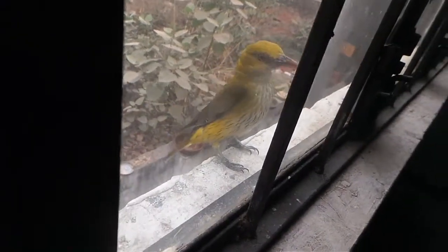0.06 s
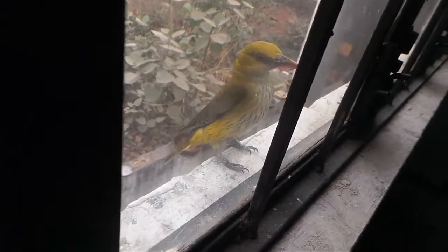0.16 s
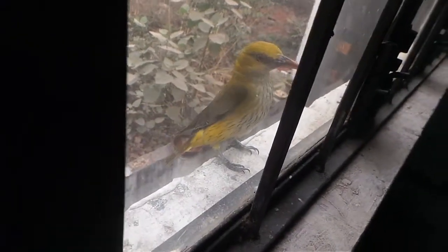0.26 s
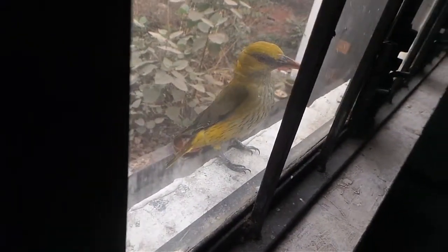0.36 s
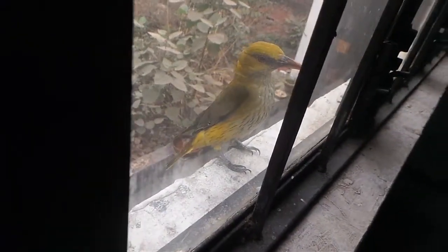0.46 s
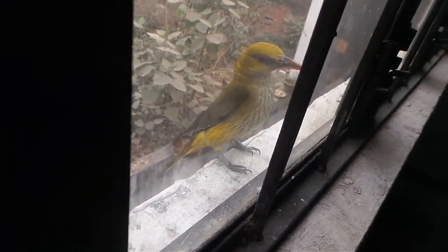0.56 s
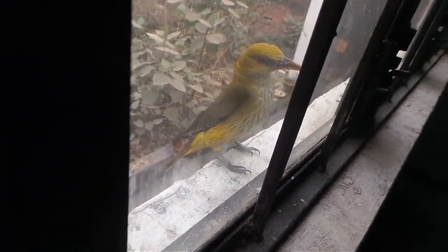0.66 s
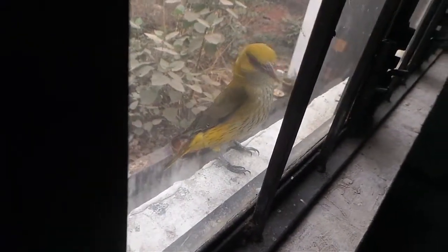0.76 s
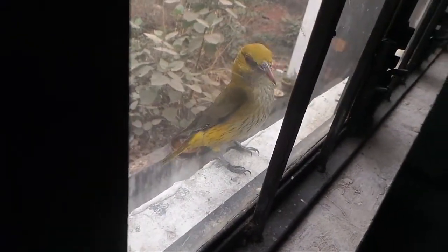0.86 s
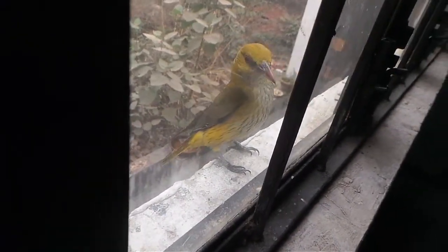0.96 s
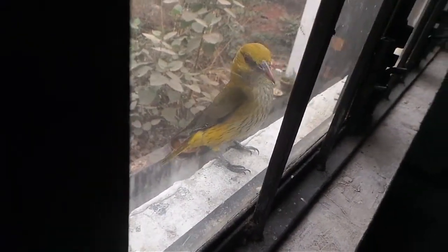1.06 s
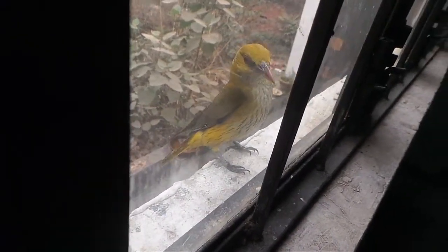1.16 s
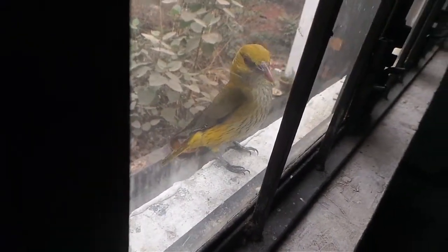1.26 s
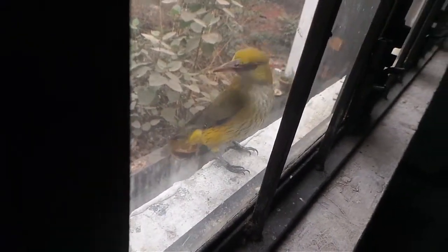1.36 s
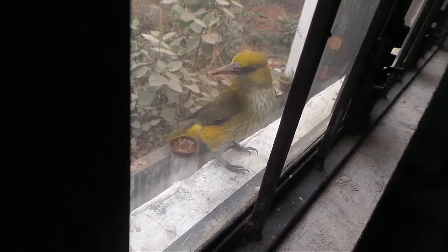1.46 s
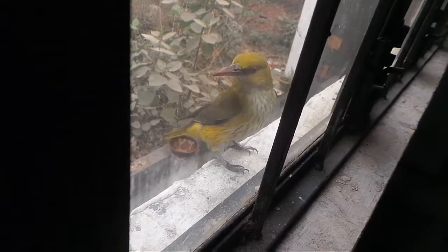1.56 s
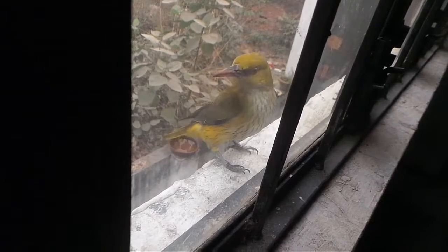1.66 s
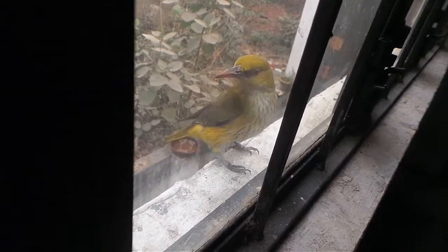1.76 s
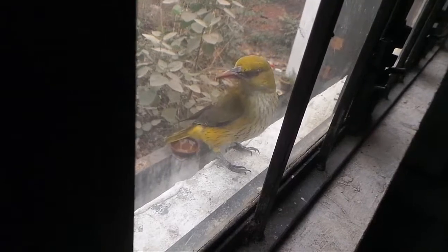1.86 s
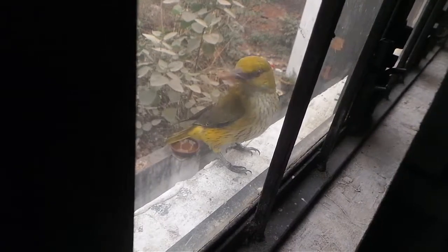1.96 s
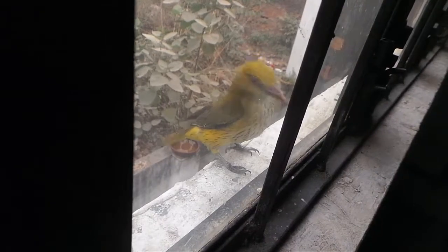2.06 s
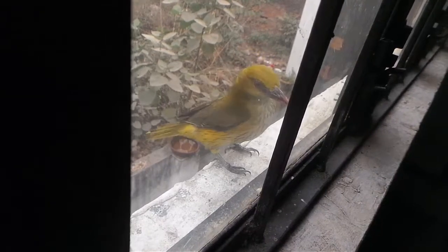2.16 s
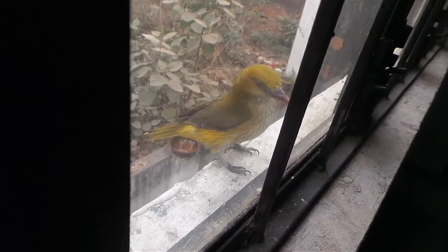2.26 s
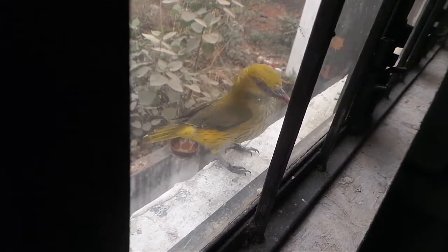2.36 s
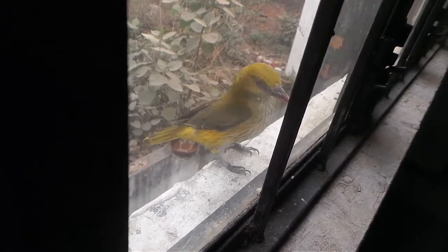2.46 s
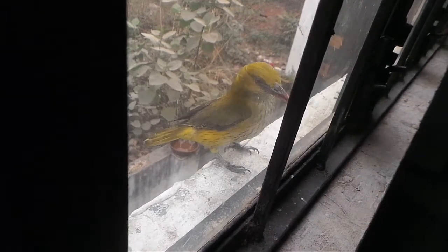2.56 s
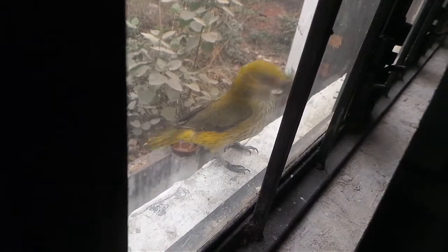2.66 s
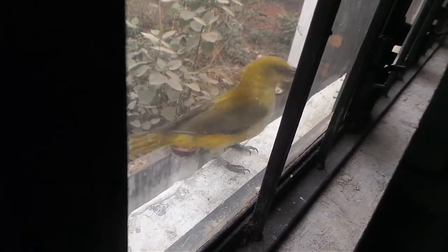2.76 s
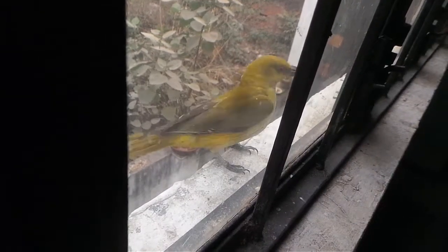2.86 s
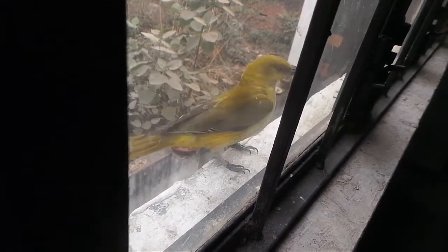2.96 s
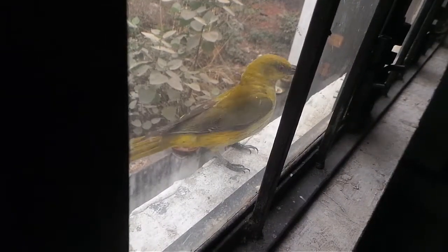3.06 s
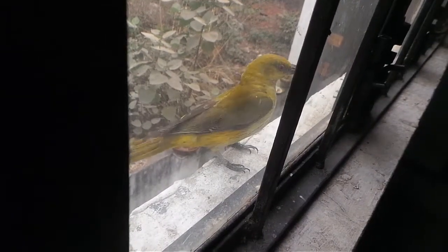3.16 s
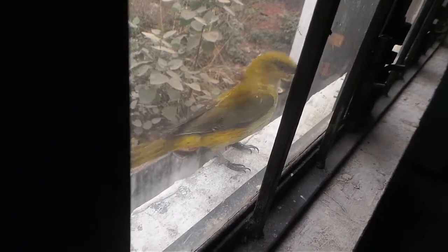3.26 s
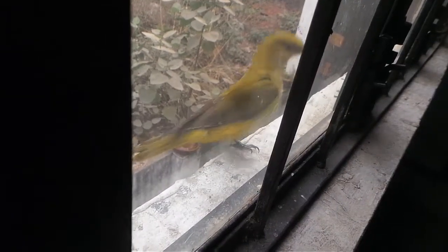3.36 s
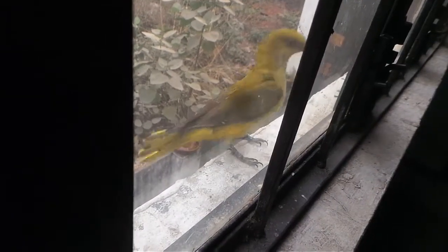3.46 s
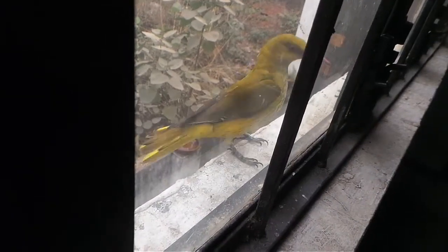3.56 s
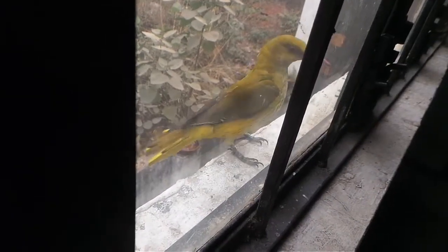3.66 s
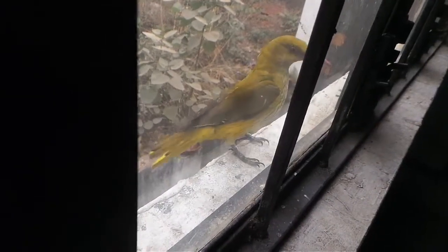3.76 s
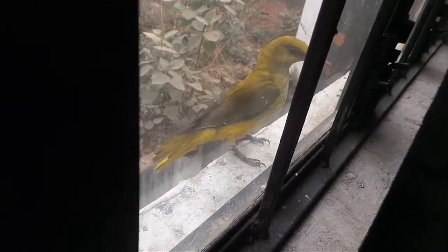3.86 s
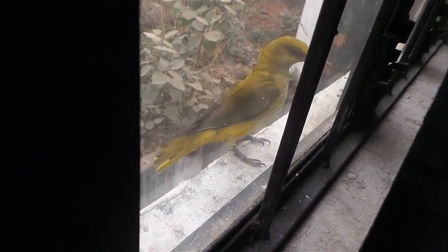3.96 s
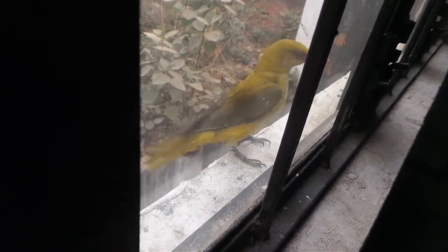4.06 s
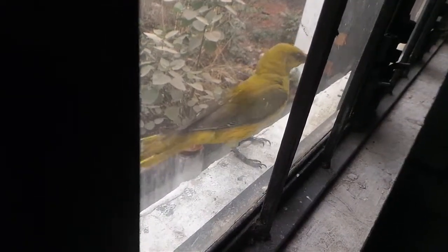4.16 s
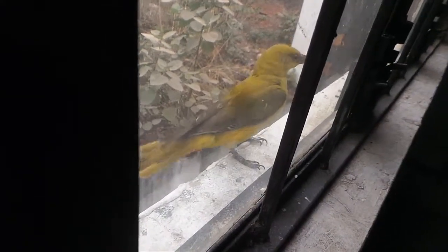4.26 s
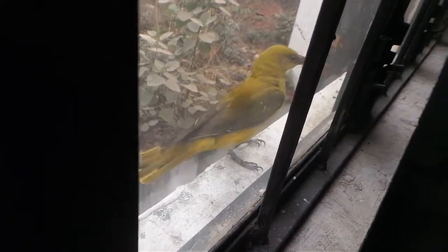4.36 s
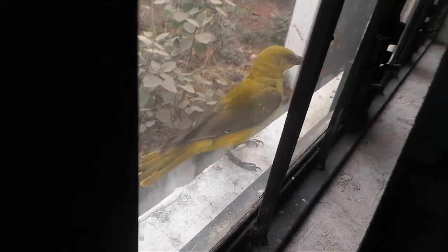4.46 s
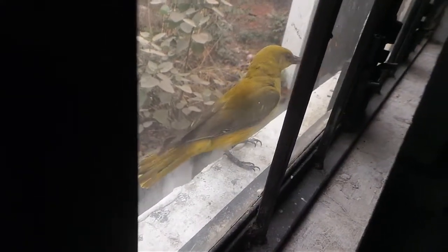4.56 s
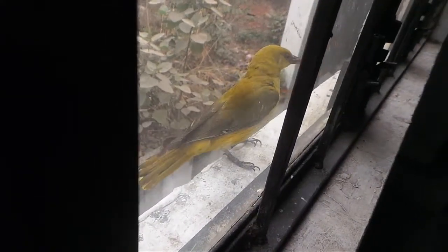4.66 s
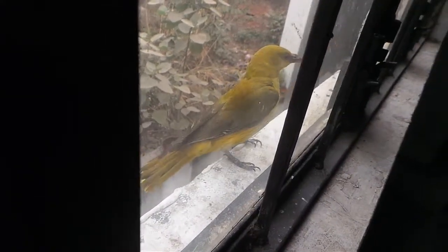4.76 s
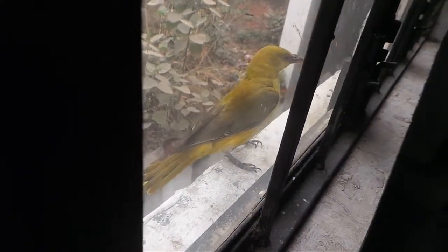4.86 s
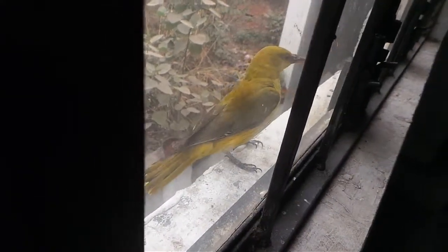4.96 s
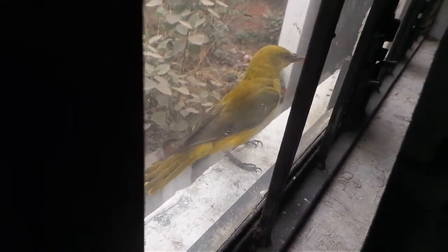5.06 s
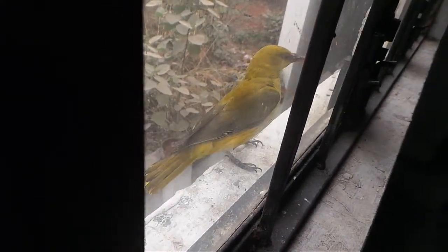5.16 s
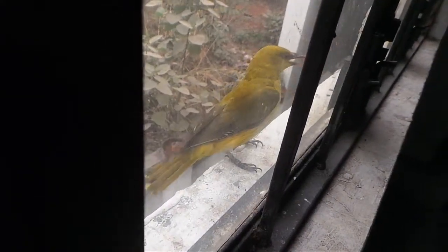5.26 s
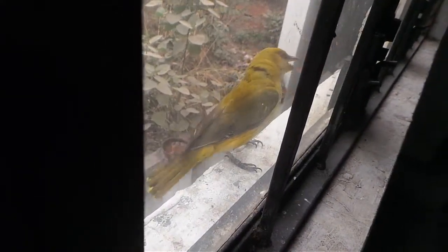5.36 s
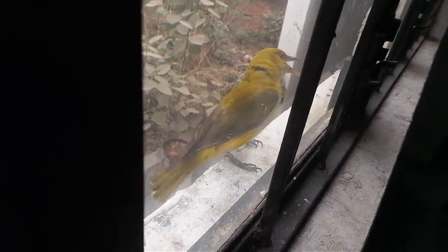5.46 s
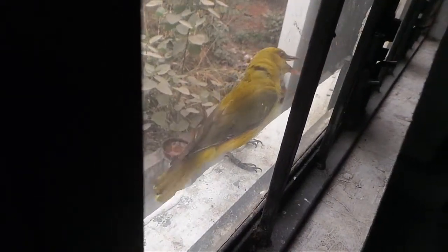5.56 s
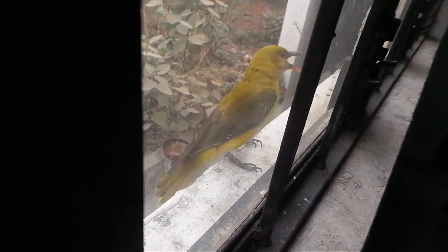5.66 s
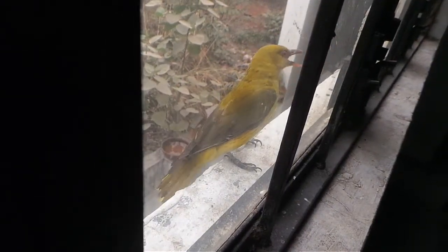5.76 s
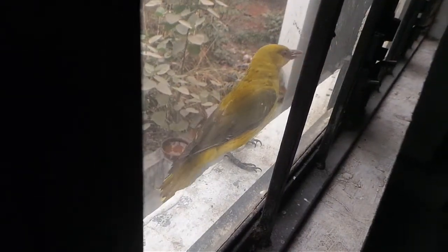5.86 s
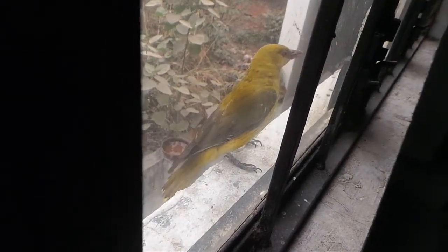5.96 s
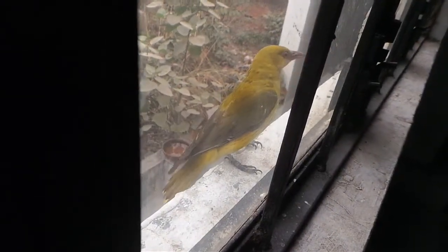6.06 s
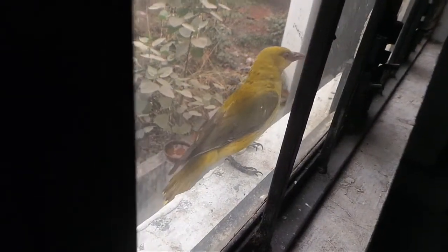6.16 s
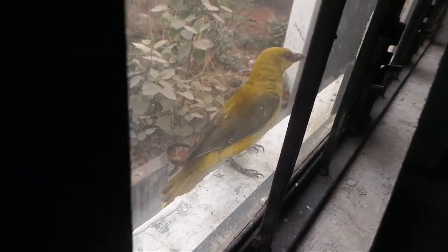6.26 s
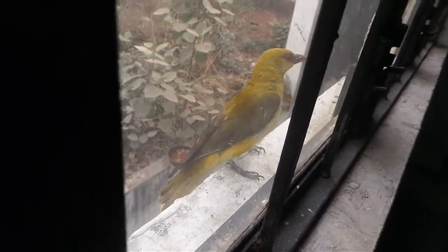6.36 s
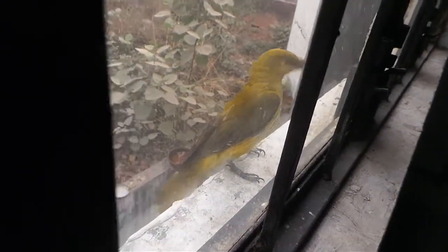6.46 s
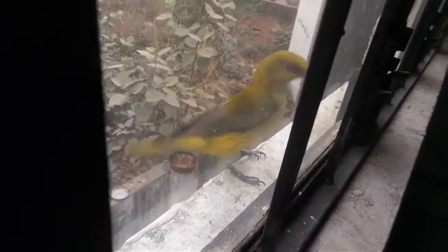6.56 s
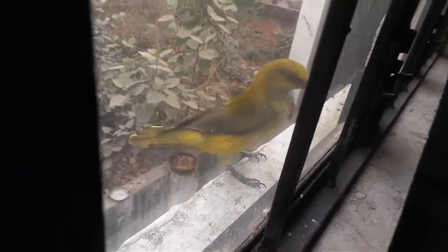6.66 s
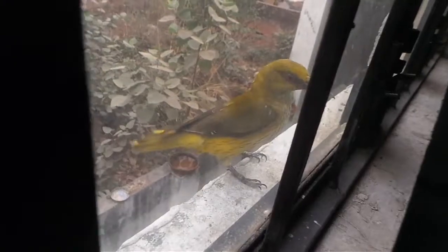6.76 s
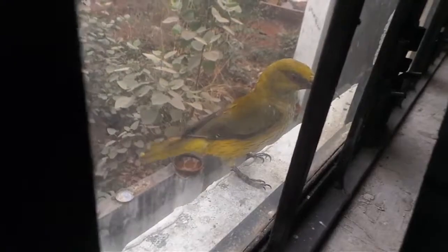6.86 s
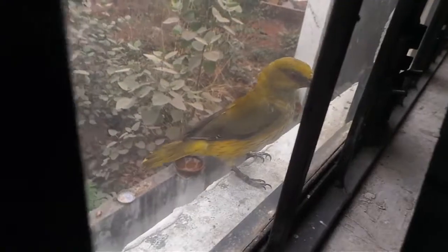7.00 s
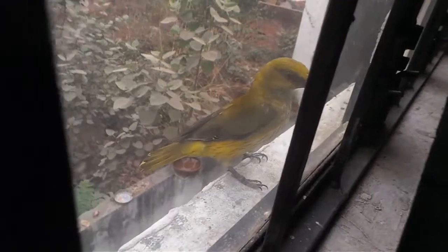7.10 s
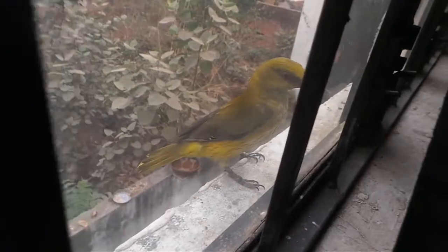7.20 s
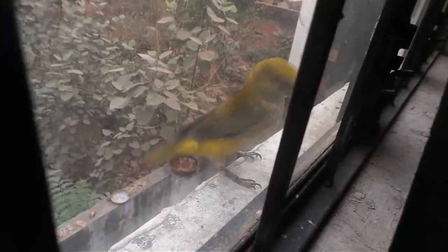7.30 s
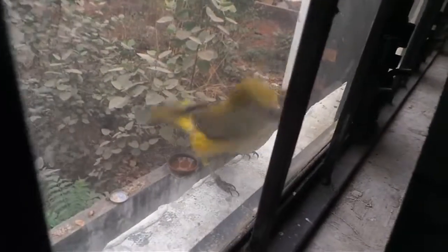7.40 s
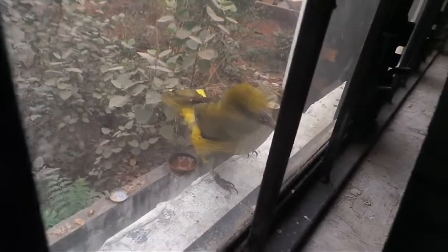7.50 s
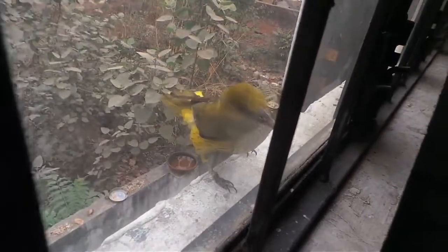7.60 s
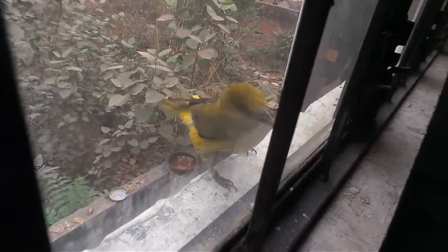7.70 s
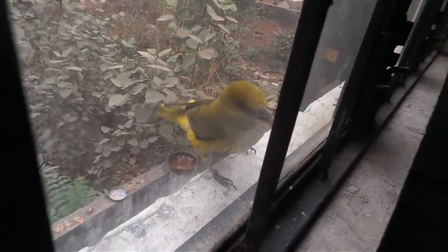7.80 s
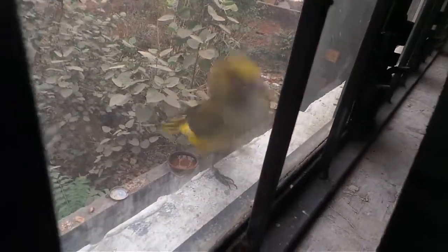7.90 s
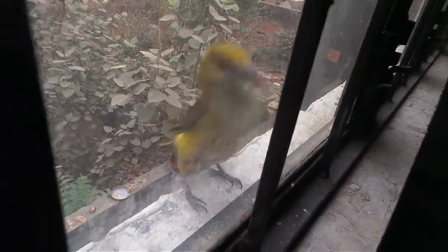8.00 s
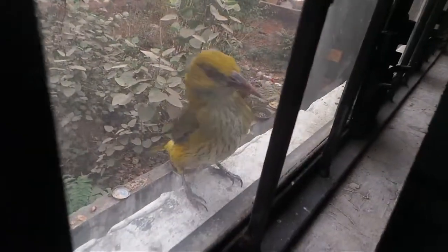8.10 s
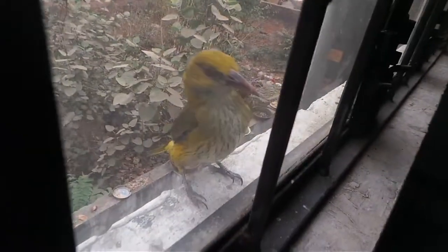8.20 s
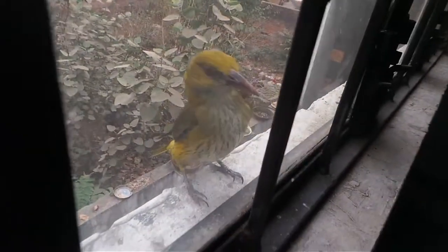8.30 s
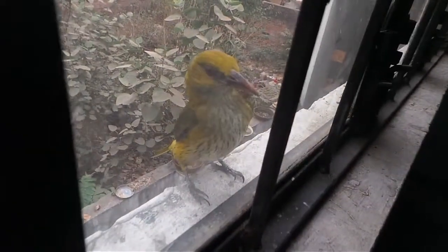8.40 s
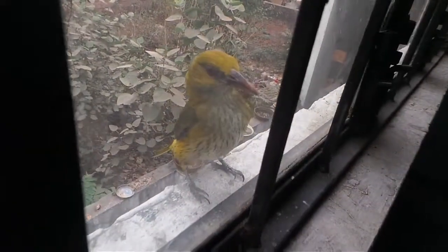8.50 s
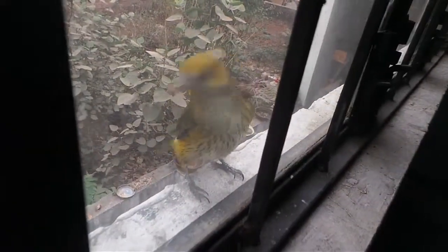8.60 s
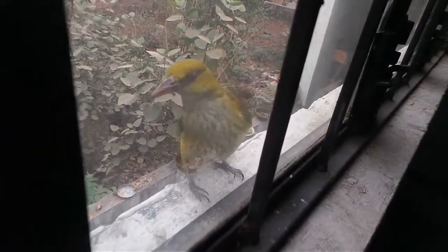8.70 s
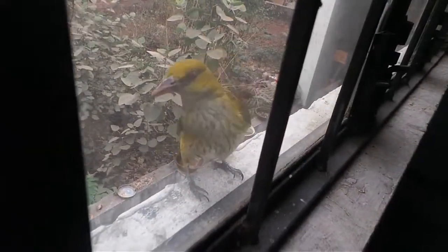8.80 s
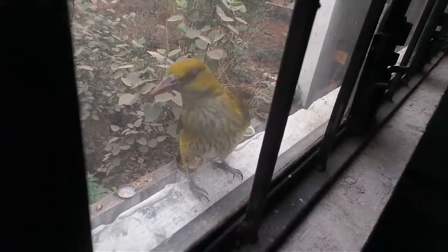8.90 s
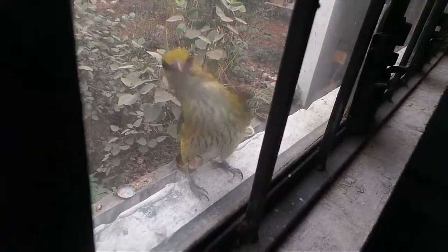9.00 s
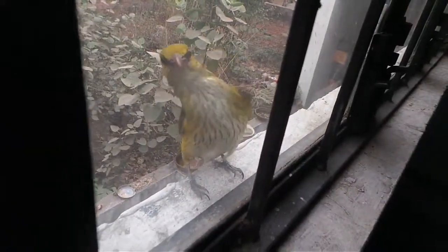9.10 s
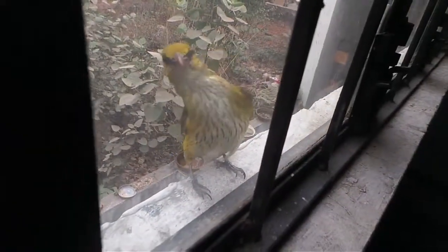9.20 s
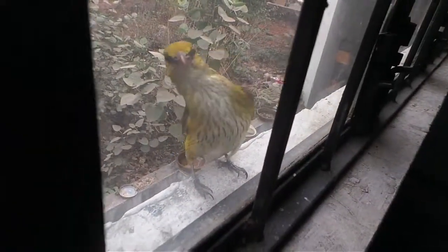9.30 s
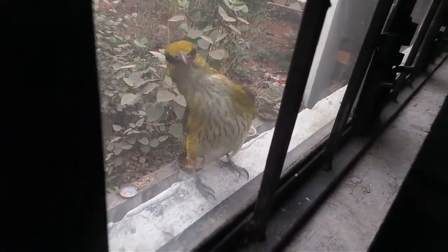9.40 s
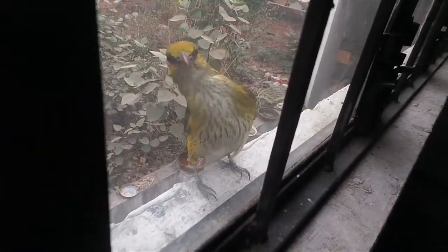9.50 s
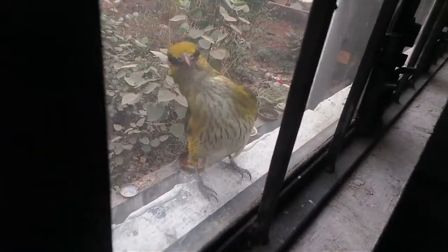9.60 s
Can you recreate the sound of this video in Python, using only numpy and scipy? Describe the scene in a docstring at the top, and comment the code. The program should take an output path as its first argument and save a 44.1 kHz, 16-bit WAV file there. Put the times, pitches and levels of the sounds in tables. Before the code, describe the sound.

A yellow bird on a windowsill gives a nasal, rising mew that rattles into a rasping screech, over low motor hum and distant chirping.

```python
"""Oriole on the window sill

Close to the microphone a golden oriole gives a nasal, rising mew that breaks through a rattle into a harsh screech.
One call is just ending, a whole one comes later; its voice is a buzz of harmonics, rasp and noise, shaped by throat
and beak, and the room behind it rings as decaying noise. Out in the garden small birds whistle and tick and something
squeals far off, all gliding tones with echoes, over the harmonic hum of a motor and the noise rumble of a town."""
import sys
import numpy as np
from scipy import signal
from scipy.fft import rfft, irfft, next_fast_len
from scipy.io import wavfile
from scipy.ndimage import uniform_filter1d

SR = 44100
rng = np.random.default_rng(int(sys.argv[2]) if len(sys.argv) > 2 else 0)


def inscribe(sig):
    """Save sig as 16-bit PCM at rate SR to the path in sys.argv[1].

    A 1-D sig is mono; a 2-D sig holds one channel per row.
    Samples are clipped to [-1, 1] before scaling.
    """
    pcm = np.round(np.clip(np.atleast_2d(sig).T, -1, 1) * 32767)
    wavfile.write(sys.argv[1], SR, pcm.astype(np.int16))


N = 425124
TIME = np.arange(N) / SR
CUTOFF_HZ = 14500   # top of the voice's harmonics and of the microphone


def from_db(db):
    """Decibels to amplitude gain."""
    return 10 ** (np.asarray(db) / 20)


def rms_one(x):
    """Scale to unit power."""
    return x / np.sqrt(np.mean(x ** 2) + 1e-20)


def in_time(rows):
    """One curve over time for each column after t/s."""
    s, *columns = np.transpose(rows)
    return [np.interp(TIME, s, column) for column in columns]


def at_hz(points, hz):
    """Read a spectrum on a log-frequency axis."""
    f, value = np.transpose(points)
    return np.interp(np.log(np.maximum(hz, 1)), np.log(f), value)


def coloured(x, spectrum):
    """Filter a sound by a spectrum in dB, then scale to rms 1."""
    size = next_fast_len(len(x))
    gain = from_db(at_hz(spectrum, np.fft.rfftfreq(size, 1 / SR)))
    return rms_one(irfft(rfft(x, size) * gain, size)[:len(x)])


def drift(rate_hz):
    """Smooth random wander of spread 1: low-passed noise made at an eighth of the sample rate."""
    lowpass = signal.butter(2, min(rate_hz, 2000), fs=SR / 8, output="sos")
    slow = signal.sosfilt(lowpass, rng.standard_normal(N // 8 + 4002))[4000:]  # skip the filter's start
    return np.interp(np.arange(N) / 8, np.arange(len(slow)), rms_one(slow))


def turn(hz):
    """Phase of an oscillator that follows a pitch curve."""
    return 2 * np.pi * np.cumsum(hz) / SR


def evened(x, size=900):
    """Hold the short-term power at 1, over a window of size samples."""
    return x / np.sqrt(np.maximum(uniform_filter1d(x ** 2, size), 0) + 1e-9)


def echoes(x, t60s, colour):
    """A diffuse tail of noise that dies at its own rate in each band."""
    t, tail = TIME[:SR], 0
    edges = np.geomspace(400, 16000, 8)
    for low, high in zip(edges, edges[1:]):
        bandpass = signal.butter(2, [low, high], "band", fs=SR, output="sos")
        band = signal.sosfilt(bandpass, rng.standard_normal(SR))
        tail = tail + band * np.exp(-np.log(1000) * t / at_hz(t60s, np.sqrt(low * high)))
    tail = coloured(tail, colour) * (1 - np.exp(-t / 0.0028))  # soft onset
    return signal.fftconvolve(x, tail / np.linalg.norm(tail))[:N]


def add(out, s, length, start_hz, end_hz, level_db, flutter_hz, bend=0.96, fade_db=0):
    """Add one fluttering note whose glide flattens towards its end."""
    u = np.linspace(0, 1, max(int(length * SR), 8))
    glide = (1 - np.exp(-bend * u)) / (1 - np.exp(-bend))
    wobble = np.interp(u, np.linspace(0, 1, 60), rng.standard_normal(60))
    hz = start_hz + (end_hz - start_hz) * glide + flutter_hz * wobble
    tone = np.sqrt(2) * np.sin(turn(hz)) * signal.windows.tukey(len(u), .4)
    note = from_db(level_db - fade_db * u) * tone
    at = max(int(s * SR), 0)
    out[at:at + len(u)] += note[:max(N - at, 0)]


def syrinx(hz, fourth_db=0, count=16):
    """A buzz of equal harmonics, of which the fourth comes and goes, and the phase of its cycle."""
    phase, fourth = turn(hz), from_db(fourth_db)
    buzz = 0
    for k in range(1, count + 1):
        buzz = buzz + np.cos(k * phase) * (k * hz < CUTOFF_HZ) * (fourth if k == 4 else 1)
    return rms_one(buzz), phase


def windpipe(x):
    """Each resonance of the airway holds its band back a little (all-pass), which smears the pulses."""
    resonances = [(2300, 800), (2900, 240), (3800, 400), (5100, 350), (7200, 590), (10500, 790)]
    for hz, width_hz in resonances:
        r = np.exp(-np.pi * width_hz / SR)
        poles = [1, -2 * r * np.cos(2 * np.pi * hz / SR), r * r]
        x = signal.lfilter(poles[::-1], poles, x)
    return x


# the oriole's calls, the end of one and a whole one, each a list of: t/s, pitch f/Hz, effort level/dB
CALLS_SUNG = [
    [(0, 1397, -23.5), (.03, 1400, -24.5), (.055, 1199, -27), (.074, 903, -32.5)],
    [(5.352, 828, -34), (5.366, 743, -31), (5.402, 776, -26), (5.436, 720.6, -32), (5.48, 707.5, -27.5),
     (5.535, 750, -28), (5.57, 803, -23.5), (5.603, 876, -19.5), (5.66, 911.6, -19.5), (5.672, 980, -20),
     (5.778, 984, -21), (5.808, 927, -26), (5.86, 759.4, -25), (5.916, 570, -29)],
]
ATTACK_DB_PER_S, RELEASE_DB_PER_S = 2200, 600


def pitch_and_effort():
    """Pitch and level of the calls, each with a quick attack and release."""
    hz, _ = in_time([row for call in CALLS_SUNG for row in call])
    levels = []
    for call in CALLS_SUNG:
        _, level_db = in_time(call)
        attack_db = ATTACK_DB_PER_S * np.maximum(call[0][0] - TIME, 0)
        release_db = RELEASE_DB_PER_S * np.maximum(TIME - call[-1][0], 0)
        levels.append(level_db - attack_db - release_db)
    return hz, np.maximum(np.max(levels, axis=0), -140)


def sets_in(start_s, takes_s):
    """A share that eases from 0 to 1."""
    return np.sin(np.pi / 2 * np.clip((TIME - start_s) / takes_s, 0, 1)) ** 2


# the voice goes from mew to rattle to screech: when each sets in, and how long the change takes
RATTLE_AT_S, SCREECH_AT_S = 5.66, 5.755
RATTLE_TAKES_S, SCREECH_TAKES_S = 0.01, 0.08
RATTLE_DEPTH, MEW_UNSTEADY, SCREECH_UNSTEADY = .55, .06, .25   # unsteadiness 0-1
# the mew is raspy while soft and clears when pushed: rasp against the tone (dB), effort at which it clears (dB)
SOFT_RASP_DB, CLEAR_RASP_DB, RATTLE_RASP_DB, CLEARS_AT_DB = -10.5, -25, -14, -21.5


def register(level_db):
    """Rasp, unsteadiness and screech share as the voice breaks; the earlier call is already a screech."""
    rattle = sets_in(RATTLE_AT_S, RATTLE_TAKES_S)
    earlier_call = TIME < CALLS_SUNG[1][0][0] / 2
    screech = np.maximum(sets_in(SCREECH_AT_S, SCREECH_TAKES_S), earlier_call)
    pushed = .5 + .5 * np.tanh((level_db - CLEARS_AT_DB) / 1.5)
    mew_rasp_db = SOFT_RASP_DB * (1 - pushed) + CLEAR_RASP_DB * pushed
    rasp_db = (1 - rattle) * mew_rasp_db + rattle * RATTLE_RASP_DB
    before_screech = MEW_UNSTEADY * (1 - rattle) + RATTLE_DEPTH * rattle
    unsteady = (1 - screech) * before_screech + screech * SCREECH_UNSTEADY
    return rasp_db, np.clip(unsteady, 0, 1), screech


# the rattle catches at an even pace
CATCH_FIRST_S, CATCH_EVERY_S = 5.6905, .0229
CATCH_WIDTH_S, CATCH_DB = 0.0016, 5.5


def catches(count=4):
    """Brief boosts in dB at the height of the rattle."""
    boost = 0
    for k in range(count):
        boost = boost + np.exp(-((TIME - CATCH_FIRST_S - k * CATCH_EVERY_S) / CATCH_WIDTH_S) ** 2)
    return CATCH_DB * boost


# throat and beak while mewing, relative: f/Hz, level/dB
THROAT = [(700, -42.5), (900, -33.5), (1010, -20), (1250, -52), (1480, -8), (1950, -12), (2280, 8),
          (2850, 2.5), (3750, 4), (4000, -8), (4400, -26), (5100, -23), (5900, -37), (7000, -12),
          (7900, -8.5), (8800, -18.5), (9800, -32), (14000, -44)]
# beak wide open in the screech, relative: f/Hz, level/dB
GAPE = [(500, -36), (1050, -15), (1600, -13), (2300, -0.5), (2850, 2.5), (3300, -5), (3850, -6.5),
        (4300, -6.5), (5100, -5), (6000, -10.5), (7100, -8), (8600, -15.5), (10700, -13), (13500, -33)]
# the band in which the rasp is strong, relative: f/Hz, level/dB
RASP = [(700, -36), (1300, -39.5), (1850, -13), (2200, -10.5), (2900, 8), (3600, -2), (4000, -9),
        (4500, -13), (5900, -30.5), (7200, -13.5), (8400, -11), (10000, -45.5), (14000, -33.5)]
# fourth harmonic of the mew against the others: t/s, level/dB
FOURTH = [(5.41, -9.5), (5.455, 6), (5.49, 4.5), (5.52, -9.5), (5.555, 7), (5.605, -0.5), (5.78, 9.5)]


def oriole():
    """A clear mew turns into a rattle as the pitch jumps, then into a chaotic screech through the open beak."""
    hz, level_db = pitch_and_effort()
    fourth_db, = in_time(FOURTH)
    rasp_db, unsteady, screech = register(level_db)
    # the membranes wobble more as the rattle sets in
    buzz, phase = syrinx(hz * (1 + (0.0035 + .03 * unsteady) * drift(230)), fourth_db)
    # strong and weak cycles alternate unevenly and fill the gaps between the harmonics
    alternation = np.cos(phase / 2) * drift(90) + 0.86 * np.cos(phase / 3) * drift(90)
    rasp = buzz * alternation + .5 * rng.standard_normal(N)
    tone = evened(coloured(buzz, THROAT))
    mew = evened(tone + from_db(rasp_db) * evened(coloured(rasp, RASP)))
    # in the screech the two sides of the syrinx run apart and the right one shakes the left
    left, _ = syrinx(hz * (1 + .03 * drift(130)), count=22)
    right, right_phase = syrinx(.73 * hz * (1 + 0.0399 * drift(124)), count=26)
    chaos = left * (1 + 0.5 * np.cos(right_phase) * drift(130)) + 0.83 * right * drift(110)
    harsh = evened(coloured(chaos + from_db(-9) * rng.standard_normal(N), GAPE))
    throb = evened(np.exp(.5 * unsteady * drift(150)), size=1800)
    voice = windpipe(np.sqrt(1 - screech) * mew + np.sqrt(screech) * harsh)
    return from_db(level_db + catches() - 2 * unsteady) * throb * voice


# the window recess rings at one pitch; the level is against the bird
RECESS_HZ, RECESS_WIDTH_HZ, RECESS_T60_S, RECESS_DB = 2874, 220, 0.71, -32


def recess(x):
    """A narrow band of decaying noise rings on after the call."""
    edges = [RECESS_HZ - RECESS_WIDTH_HZ / 2, RECESS_HZ + RECESS_WIDTH_HZ / 2]
    band = signal.butter(2, edges, "band", fs=SR, output="sos")
    tail = signal.sosfilt(band, rng.standard_normal(SR)) * from_db(-60 * TIME[:SR] / RECESS_T60_S)
    return from_db(RECESS_DB) * signal.fftconvolve(x, tail / np.linalg.norm(tail))[:N]


# how long the room behind the sill rings: f/Hz, t60 t/s
ROOM_T60 = [(500, 1.27), (2800, 0.4559), (6000, 0.63), (12000, 0.27)]
# colour of that ring, relative: f/Hz, level/dB
ROOM_COLOUR = [(500, -7), (2000, -2.5), (2900, -0.5), (3700, -2.5), (6000, -0.5), (9000, -3), (13000, -2)]


def room(near):
    """The room answers the sounds on the sill with a diffuse tail, the recess with one pitch."""
    return from_db(-8.5) * echoes(near, ROOM_T60, ROOM_COLOUR) + recess(near)


# the motor's load, before MOTOR_DB is added: t/s, level/dB
MOTOR_LOAD = [(0.0, -45), (0.16, -46), (0.32, -51.5), (0.54, -46.5), (1.29, -50), (1.55, -46.5),
              (2.15, -51.5), (3.62, -43.5), (7.73, -45.5), (7.97, -43), (9.1, -45), (9.34, -49),
              (9.56, -45), (9.64, -46)]
# the hum's overtones, relative: multiple of MOTOR_HZ, level/dB
MOTOR_ORDERS = [(1, -4), (2, -19), (3, -22.5), (5, -38.5)]
MOTOR_HZ, MOTOR_DB = 139.2, 3.5
# a tone that swells once in the hum
SWELL_S, SWELL_WIDTH_S, SWELL_HZ, SWELL_DB = 3.9, 0.43, 698, -60.5


def motor():
    """A low, slightly unsteady hum of harmonics, in which a higher tone swells once."""
    load_db, = in_time(MOTOR_LOAD)
    phase = turn(MOTOR_HZ * (1 + 0.00499 * drift(4.47)))
    hum = sum(from_db(db + 1.0 * drift(5.2)) * np.sin(k * phase) for k, db in MOTOR_ORDERS)
    swell = from_db(SWELL_DB) / (1 + ((TIME - SWELL_S) / SWELL_WIDTH_S) ** 2)
    swelling_tone = swell * np.sin(turn(SWELL_HZ + 2 * drift(5.7)))
    return np.sqrt(2) * (from_db(MOTOR_DB + load_db) * hum + swelling_tone)


# spectrum of the town's rumble, relative: f/Hz, level/dB
TOWN = [(15, -50), (25, -13.5), (108, -8.5), (123, -10), (140, -6.5), (169, -5.5), (275, -11), (378, -17),
        (415, -13.5), (593, -21), (702, -21.5), (785, -25), (2200, -43.5), (2860, -70), (4840, -120)]
# spectrum of the thin hiss above it, relative: f/Hz, level/dB
AIR = [(880, -7), (1500, -5.5), (2130, -8.5), (3660, -12), (4140, -12.5), (9020, -19), (12800, -22),
       (14500, -25.5)]
TOWN_DB = -48.5


def town():
    """Rumble of far traffic under a thin, even hiss, both coloured noise."""
    rumble = from_db(TOWN_DB + .5 * drift(4.2)) * coloured(rng.standard_normal(N), TOWN)
    return rumble + from_db(-64) * coloured(rng.standard_normal(N), AIR)


# Levels of all garden voices, here and below, are at the source, before the loss over distance.
# a small bird's two-note song, repeated in bouts: first t/s, until t/s, period t/s
SEESAW_BOUTS = [(.285, .73, .298), (2.449, 4.85, .282), (6.2, 7.78, .285)]


def seesaw(out):
    """A short lower note, then a longer higher one, over and over."""
    for first_s, until_s, period_s in SEESAW_BOUTS:
        for s in np.arange(first_s, until_s, period_s):
            add(out, s - .03, .035, 4800, 4580, level_db=-67.0, flutter_hz=59.4)
            add(out, s, .07, 5750, 5300, level_db=-65.5, flutter_hz=150)


# thin contact notes: t/s, top f/Hz, level/dB
TICKS = [(.339, 8720, -62), (.81, 8650, -65), (1.26, 8400, -68), (1.72, 8340, -65), (2.91, 9200, -63),
         (3.33, 8800, -60.5), (4.10, 8100, -65), (4.58, 9000, -62), (5.08, 8800, -63.5),
         (6.42, 9060, -60.5), (6.879, 8200, -66), (7.53, 8460, -66), (8.07, 8560, -62), (9.361, 8200, -63)]


def ticks(out):
    """Very short, high notes that rise fast to their top."""
    for s, top_hz, level_db in TICKS:
        add(out, s, .035, 0.89 * top_hz, top_hz, level_db, flutter_hz=150.3, bend=3)


# a far bird's steep slur: t/s, level/dB
SLURS = [(.38, -61), (2.265, -57), (3.79, -57.5), (7.85, -58)]
SLUR_S, SLUR_TOP_HZ, SLUR_END_HZ, SLUR_BEND, SLUR_FADE_DB = .17, 5030, 2530, 1.4, 6.5


def slurs(out):
    """A fading whistle that falls an octave, always in the same shape."""
    for s, level_db in SLURS:
        add(out, s, SLUR_S, SLUR_TOP_HZ, SLUR_END_HZ, level_db, flutter_hz=75, bend=SLUR_BEND,
            fade_db=SLUR_FADE_DB)


# a far bird's low note, about every two seconds: t/s, level/dB
LOW_NOTES = [(.5, -74), (2.38, -70), (4.38, -73), (6.239, -64), (8.24, -65.5)]


def low_notes(out):
    """A low, slightly rising note with a strong flutter."""
    for s, level_db in LOW_NOTES:
        add(out, s, .18, 1420, 1480, level_db, flutter_hz=96)


# another bird's rambling whistles: t/s, length t/s, start f/Hz, end f/Hz, level/dB
WHISTLES = [(0.745, 0.19, 4750, 4040, -62.5), (.911, 0.15, 4350, 3250, -61), (1.168, 0.18, 3393, 3290, -60),
            (1.389, 0.13, 4010, 3705, -61.5), (1.513, .094, 3315, 3020, -63.5),
            (1.695, 0.11, 4130, 4290, -65), (1.772, 0.081, 3470, 3380, -62.5),
            (2.008, 0.1, 4280, 4350, -64), (2.03, 0.3, 5300, 5130, -67), (2.412, .077, 4900, 4620, -57.5),
            (2.621, .1, 6180, 4610, -64.5), (2.94, 0.12, 2980, 2506, -63), (3.179, 0.19, 4210, 4035, -57.5),
            (3.322, 0.22, 4220, 3446, -58.5), (3.449, 0.7, 1846, 1805, -72.5),
            (7.301, 0.28, 4170, 4250, -75), (7.453, 0.24, 4620, 4840, -70),
            (8.053, 0.077, 6120, 4730, -61.5), (8.517, 0.25, 3480, 3407, -59),
            (8.591, 0.31, 2970, 2710, -70), (9.516, 0.12, 3275, 3185, -66)]
FLUTTER_HZ, FLUTTER_PER_GLIDE = 21, 0.202   # the second in Hz per Hz of glide


def whistles(out):
    """Gliding whistles; the wider one glides, the more it flutters."""
    for s, length, start_hz, end_hz, level_db in WHISTLES:
        flutter_hz = FLUTTER_HZ + FLUTTER_PER_GLIDE * abs(end_hz - start_hz)
        add(out, s, length, start_hz, end_hz, level_db, flutter_hz)


# claws and feathers as the bird shifts on the sill: t/s, level/dB, decay t/s, bright against dull level/dB
SHUFFLES = [(3.769, -65, .005, 5), (3.809, -59, 0.0055, 10.5), (6.425, -61, 0.068, 6),
            (7.491, -48.5, 0.0044, -9), (7.901, -60.5, .08, 5)]


def shuffles():
    """Short dull taps and brighter brushes of feathers: noise that starts at once and dies away."""
    dull = coloured(rng.standard_normal(N), [(300, -12), (1100, 12), (3000, -8), (12000, -25.5)])
    bright = coloured(rng.standard_normal(N), [(1000, -10), (2600, 8), (4000, 8), (8000, -1), (13000, -27)])
    out = np.zeros(N)
    for s, level_db, decay, bright_db in SHUFFLES:
        age = np.maximum(TIME - s, 0)
        noise = rms_one(dull + from_db(bright_db) * bright)
        out += from_db(level_db) * noise * (age > 0) * np.exp(-age / decay)
    return out


HISS_S, HISS_RISE_S, HISS_FALL_S, HISS_DB = 5.08, .08, .04, -56.5   # peak time, widths, level


def hiss():
    """Before its whole call the oriole hisses softly through the open beak: noise swelling to a peak."""
    width_s = np.where(TIME < HISS_S, HISS_RISE_S, HISS_FALL_S)
    swell = np.exp(-((TIME - HISS_S) / width_s) ** 2)
    return from_db(HISS_DB) * swell * coloured(rng.standard_normal(N), GAPE)


# the squeal's pulls: t/s, length t/s, top of the (unheard) fundamental f/Hz, its sag by the end f/Hz, level/dB
SQUEALS = [(8.493, 0.39, 1198, 150, -59.5), (8.955, 0.21, 1119, 54.2, -59), (9.219, .5, 1104, 25, -61)]
# its partials, relative: multiple of the fundamental, level/dB
SQUEAL_PARTIALS = [(2, -14.5), (4, -3.5), (5, 2), (6, -15)]
SQUEAL_CREST, SQUEAL_FADE = .3, 0.16   # shares of a pull: where its pitch tops, how much of it fades


def squeal():
    """Three drawn-out pulls of a thin, slightly rough tone, each arching up and sagging."""
    out, waver = np.zeros(N), 1 + 0.0091 * drift(88) + .008 * drift(13)
    for s, length, top_hz, sag_hz, level_db in SQUEALS:
        u = np.clip((TIME - s) / length, 0, 1)
        on = (u > 0) & (u < 1)
        u = u[on]
        arch = ((u - SQUEAL_CREST) / (1 - SQUEAL_CREST)) ** 2
        phase = turn((top_hz - sag_hz * arch) * waver[on])
        tone = sum(from_db(db) * np.sin(k * phase) for k, db in SQUEAL_PARTIALS)
        out[on] += from_db(level_db) * signal.windows.tukey(len(u), SQUEAL_FADE) * tone
    return np.sqrt(2) * out


def garden():
    """Far birds, heard mostly by way of the walls and trees around; the ticks and squeal are a little nearer."""
    far, nearer = np.zeros(N), squeal()
    for voice in (whistles, slurs, seesaw, low_notes):
        voice(far)
    ticks(nearer)
    wash_t60 = [(2000, 1.04), (5000, 1.0), (9000, 0.92)]
    wash = echoes(far + from_db(-3.5) * nearer, wash_t60, [(2000, 0), (9000, -2)])
    direct = from_db(-7) * far + from_db(-8.5) * nearer
    return direct + from_db(-3.0) * wash


def scene():
    """The oriole close by, the room behind it, the garden beyond."""
    near = oriole() + hiss() + shuffles()
    return (from_db(-0.32) * near + room(near) + garden() + motor() + town())[None]


def record(dry):
    """The microphone loses the deepest rumble; the top is cut steeply."""
    thinned = signal.sosfilt(signal.butter(4, 30, "high", fs=SR, output="sos"), dry)
    return signal.sosfilt(signal.ellip(10, .1, 70, CUTOFF_HZ, fs=SR, output="sos"), thinned)


dry = scene()
out = record(dry)
inscribe(out)
```